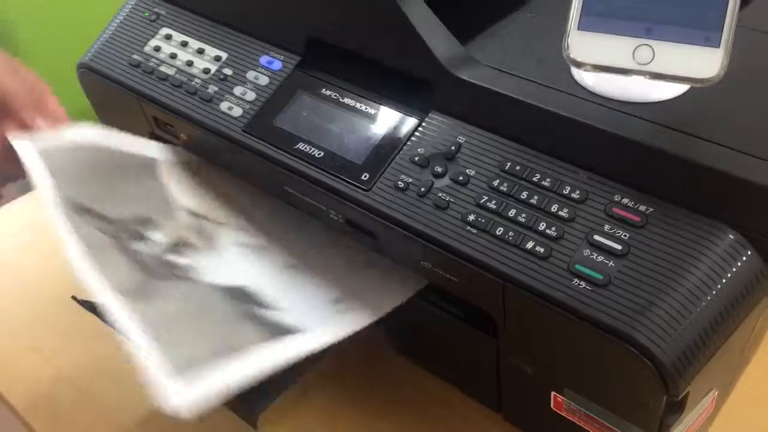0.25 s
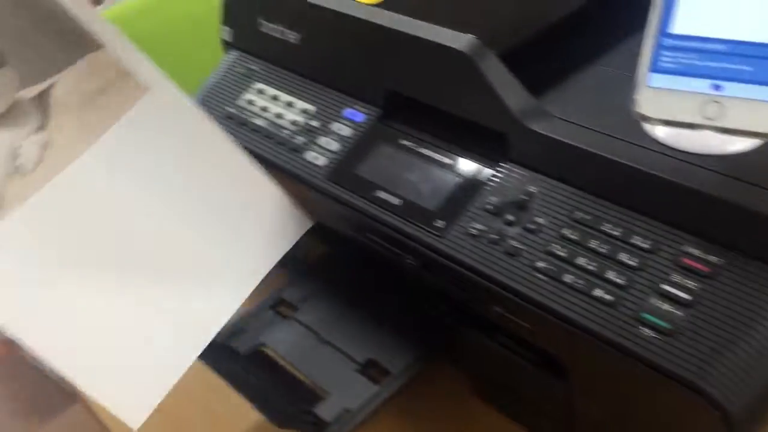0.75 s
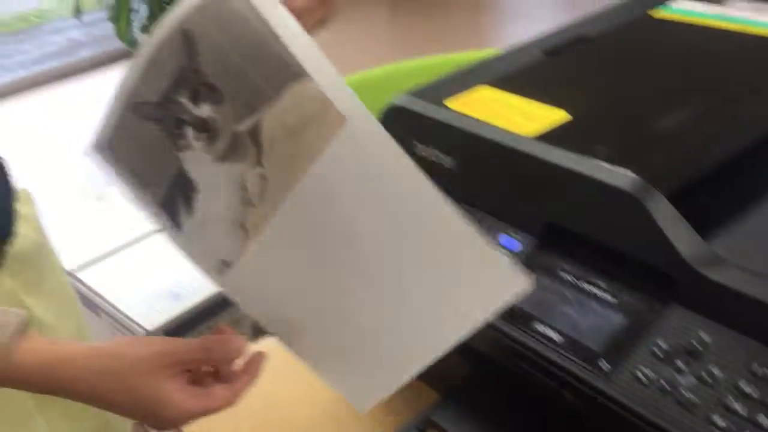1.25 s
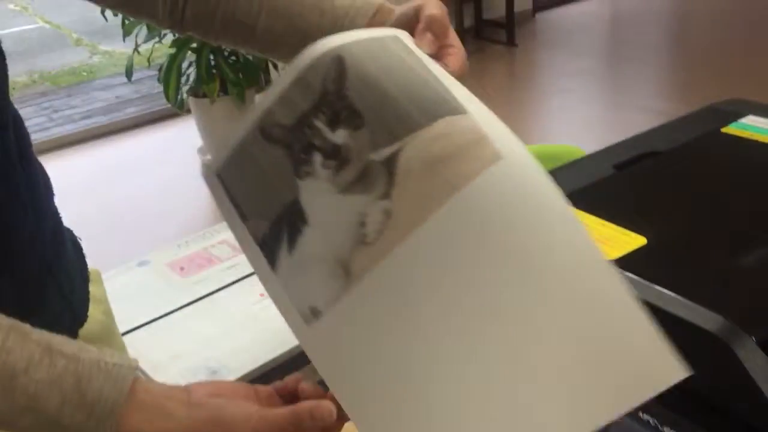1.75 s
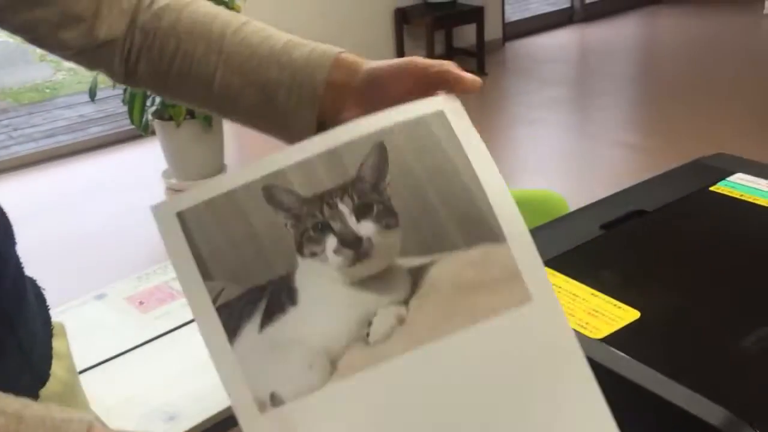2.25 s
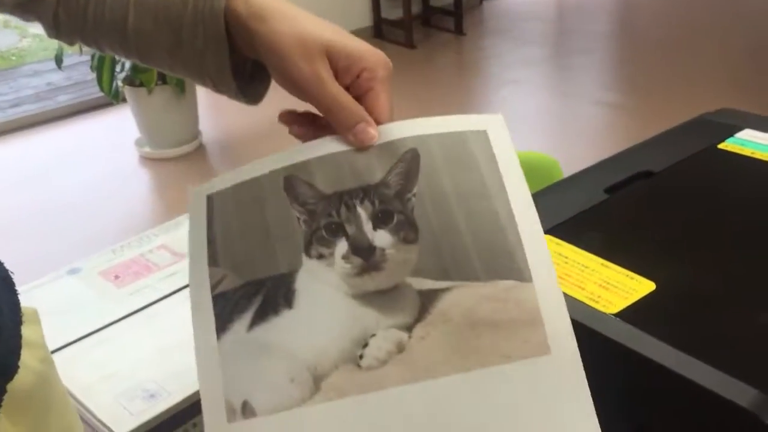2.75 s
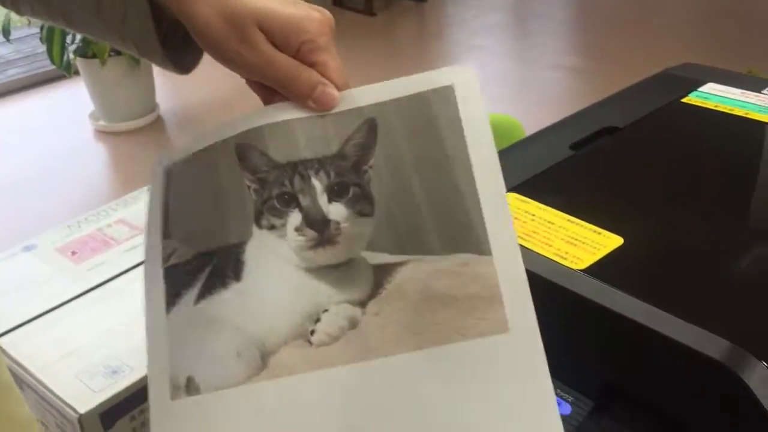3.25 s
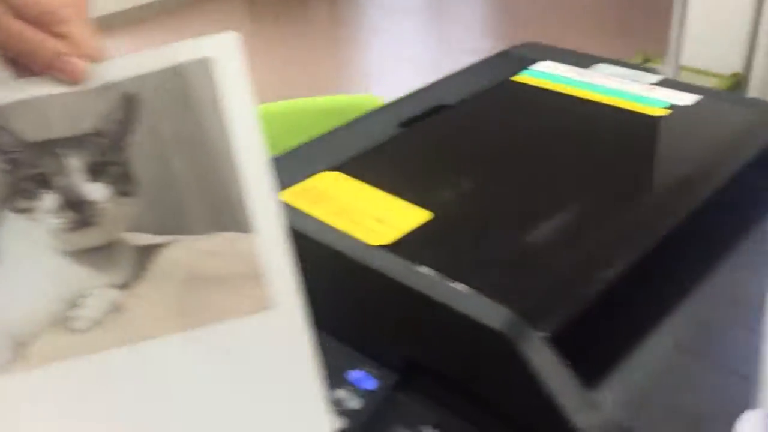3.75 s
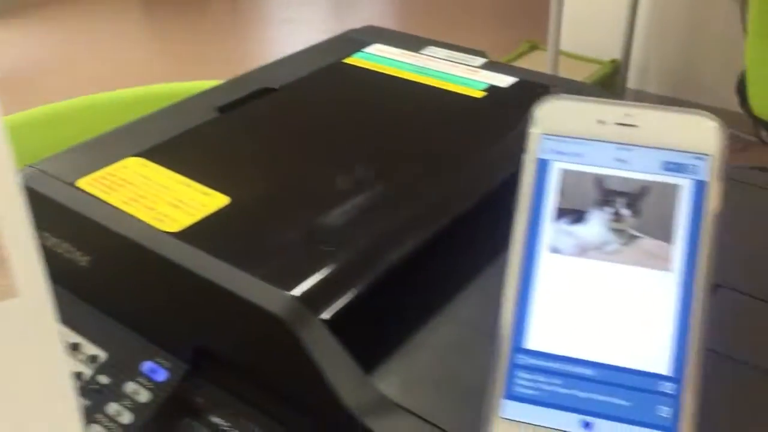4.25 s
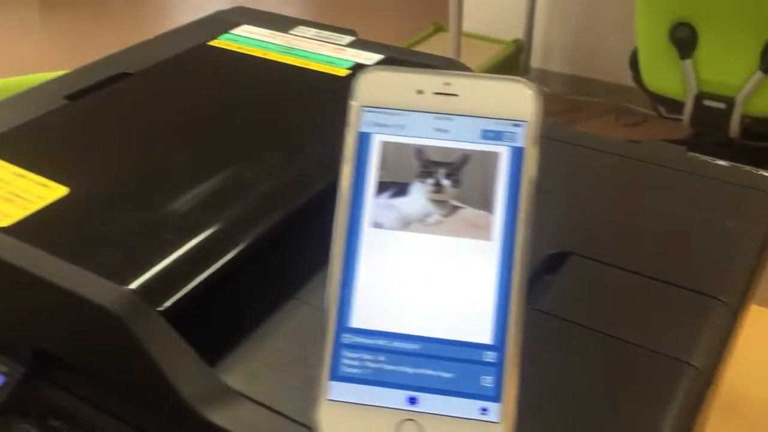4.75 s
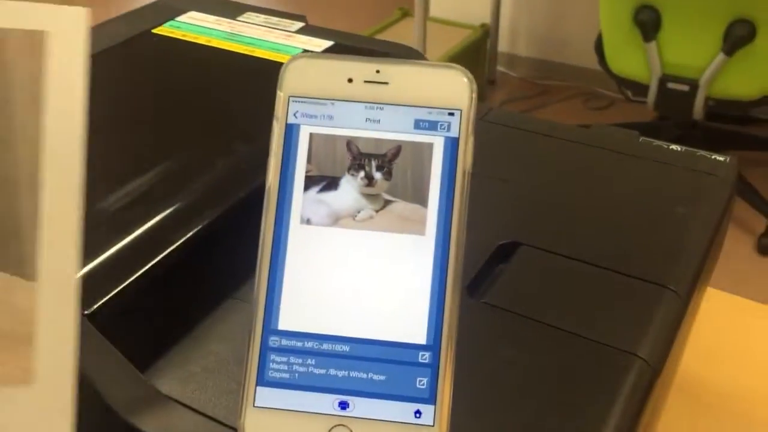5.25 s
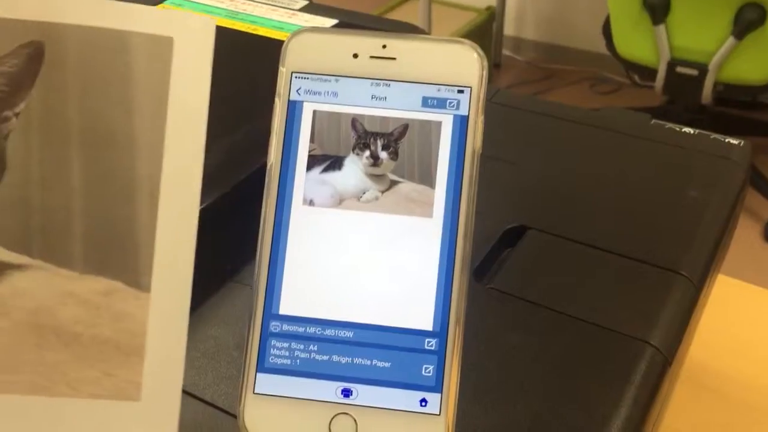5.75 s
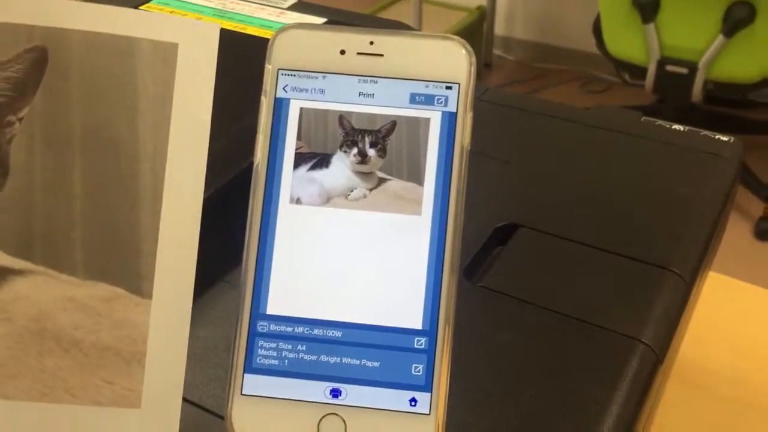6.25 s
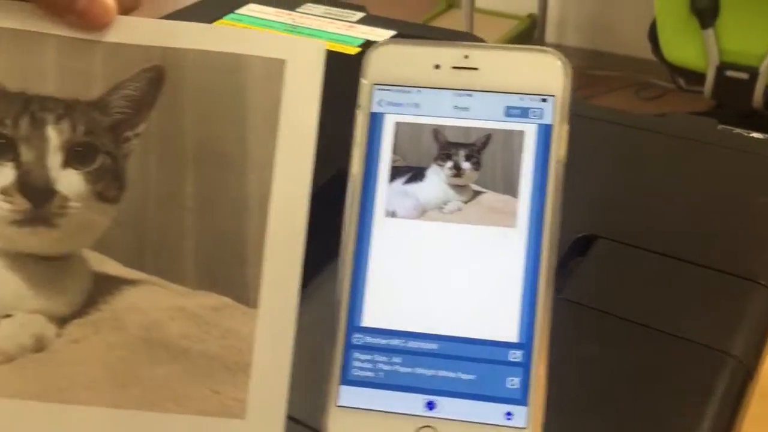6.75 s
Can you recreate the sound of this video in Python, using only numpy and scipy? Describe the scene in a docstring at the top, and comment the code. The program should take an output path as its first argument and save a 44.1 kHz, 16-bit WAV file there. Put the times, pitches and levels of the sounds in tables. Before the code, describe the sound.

Close in a quiet room, paper rustles, buckles and clacks, a printer carriage whirs once briefly, and a low motor ticks and throbs.

```python
"""A quiet room, close to an inkjet printer that finishes a page. The stiff sheet is pulled off the tray: filtered
noise grains slide and flap, and short bursts and damped modes snap, buckle and thump among plastic clacks.
A feed motor's hum runs down at the start. Later the carriage makes one short run, a whine that follows its
speed over rolling noise; then a slow motor ticks and hums, two close tones beating in a swelling throb.
Soft room reflections and filtered noise for the ventilation lie underneath."""
import sys
import numpy as np
from scipy import signal
from scipy.fft import rfft, irfft, next_fast_len
from scipy.io import wavfile
from scipy.ndimage import uniform_filter1d, map_coordinates

SR = 44100
rng = np.random.default_rng(int(sys.argv[2]) if len(sys.argv) > 2 else 0)


def generate_wav(signal):
    """Clip the signal to [-1, 1] and save it as 16-bit WAV at the path in sys.argv[1]."""
    frames = np.transpose(np.atleast_2d(signal))
    scaled = np.clip(frames, -1, 1) * 32767
    pcm = np.round(scaled).astype(np.int16)
    wavfile.write(sys.argv[1], SR, pcm)


N = 309582
T = np.arange(N) / SR  # the scene's time line in seconds

# The sheet dragged off the tray. Each row: time in seconds, friction in dB before the PULL_DB trim.
PULL_FRICTION = [(0.15, -64), (0.272, -51.5), (0.388, -53), (0.858, -56.5), (0.92, -53.5), (1.048, -53),
                 (1.162, -69), (1.392, -76.5), (1.45, -75)]
# Later brushes and flaps of the sheet. Each row: start in seconds, hold in seconds, fade to -60 dB in seconds,
# level in dB, brightness in dB (grain gains it, bending loses it).
PAPER_STROKES = [(0.088, 0.037, 0.15, -59.5, -4), (0.22, 0.021, 0.024, -53, 15),
                 (0.545, 0.024, 0.06, -56.5, -13.5), (0.698, 0.051, 0.05, -63, 12.5),
                 (0.945, 0.035, 0.035, -54.5, -2), (1.06, 0.051, 0.28, -66, 2.5),
                 (1.215, 0.029, 0.024, -59, 0.5), (1.5, 0.44, 0.26, -76.5, -2),
                 (1.683, 0.042, 0.03, -59, 0), (2.06, 0.13, 0.054, -55.5, -0.5),
                 (2.19, 0.14, 1.08, -57, -4.5), (2.747, 0.19, 0.29, -58, 4.5), (3.136, 0.038, 0.29, -65, 1),
                 (3.3, 0.031, 0.97, -72.5, -8), (3.532, 0.018, 0.42, -69, -2), (3.73, 0.11, 0.28, -78, 7),
                 (4.74, 0.17, 0.11, -74, 1), (6.58, 0.06, 0.54, -72, -3.5), (6.72, 0.28, 0.3, -83, -8)]
# Broad bending of the sheet. Each row: frequency in Hz, gain in dB.
BENDING_SPECTRUM = [(300, -19), (700, -16), (1100, -7), (1600, 0.5), (2200, 0.5), (3000, -17.5),
                    (4500, -21.5), (9000, -47)]
# Rubbing fibres. Each row: frequency in Hz, gain in dB.
FIBRE_SPECTRUM = [(1000, -53), (2500, -6.5), (3300, -4.5), (4200, 0), (4900, -2.5), (5700, -3), (6700, -8),
                  (7600, -23), (10000, -36), (15500, -37)]
# Finest grain of the sheet. Each row: frequency in Hz, gain in dB.
SHEEN_SPECTRUM = [(3000, -37), (6500, 0), (8000, -3), (9700, 1), (10600, -4), (11800, 0.5), (13500, -8),
                  (15500, -5.5)]
# Sharp snaps of paper and plastic. Each row: start in seconds, level in dB, centre in Hz,
# bright edge in dB over the body.
SNAPS = [(0.102, -42.5, 1930, -7), (0.118, -42, 1850, -1.5), (0.237, -30.5, 1980, 5),
         (0.262, -40.5, 1420, -13), (0.653, -41, 1030, -1), (0.709, -39, 1230, -19),
         (0.739, -35.5, 1590, -16), (0.825, -39.5, 1990, -14), (0.872, -32.5, 1380, 4),
         (0.989, -38.5, 1190, 0.5), (1.041, -44, 1070, 1), (1.272, -43, 1750, -19), (1.418, -47, 894, -23),
         (1.763, -46, 830, -16), (2.151, -32, 1560, -8), (2.171, -32, 1880, -18), (2.253, -24.5, 1280, -26),
         (2.365, -43, 1450, -21), (2.5, -35, 1174, -16), (2.784, -31.5, 1230, -6.5),
         (3.067, -27.5, 2010, -3), (3.096, -36.5, 1000, -23), (3.26, -39, 1880, -5.5),
         (3.288, -30.5, 1200, -5), (3.464, -50, 1430, -26), (3.556, -50, 1930, 0.5),
         (3.589, -58.5, 1720, 0), (5.291, -49.5, 988, -26), (5.944, -59, 1260, -5.5)]
# Damped modes of one snap. Each row: multiple of its centre, level in dB; both scatter from snap to snap.
SNAP_MODE_TABLE = [(.66, -17.5), (1.0, 9), (1.38, -3), (1.8, 0)]
# Bright edge of a snap. Each row: nominal frequency in Hz, level in dB; both scatter from snap to snap.
EDGE_MODE_TABLE = [(3900, 3.5), (4500, 1.5), (5500, 2.5), (6400, -4), (9700, -13), (12000, -16)]
# The sheet buckling and plastic parts chattering. Each row: start in seconds, hold in seconds, level in dB,
# treble boost in dB before levelling.
CHATTERS = [(0.115, 0.0066, -44, 10), (0.555, 0.0099, -45, 17), (0.615, 0.027, -51.5, -18),
            (0.72, 0.048, -50.5, 10), (0.948, 0.028, -52.5, 11), (1.327, 0.05, -57.5, -24),
            (1.695, 0.032, -52, -13), (1.739, 0.032, -54, -8), (2.08, 0.054, -41.5, -8),
            (2.145, 0.038, -40, -2.5), (2.195, 0.031, -51, 9), (2.264, 0.02, -46.5, -11),
            (2.306, 0.005, -41.5, -2), (2.506, 0.0045, -48, -6), (2.786, 0.013, -40.5, -9),
            (2.938, 0.01, -47, -32), (3.009, 0.03, -56, -31), (3.09, 0.021, -43, -19),
            (3.253, 0.049, -37.5, 4), (3.284, 0.0089, -33.5, -4), (3.336, 0.014, -50.5, -5),
            (6.063, 0.017, -63.5, 16), (6.738, 0.015, -61.5, 6)]
# Dull pushes of the sheet and the drive. Each row: start in seconds, hold in seconds, level in dB, centre in Hz.
PUSHES = [(0.655, 0.019, -43, 159), (0.709, 0.035, -38, 146), (0.792, 0.028, -45, 131),
          (2.152, 0.032, -53, 97), (2.936, 0.0082, -51, 356), (3.08, 0.052, -50, 152),
          (3.262, 0.041, -50.5, 413), (4.854, 0.02, -46.5, 174), (5.169, 0.035, -51, 400),
          (5.287, 0.021, -45.5, 166)]
# Ring of sheet and housing. Each row: frequency in Hz, gain in dB.
HOUSING_SPECTRUM = [(71, -27.5), (120, -3), (240, -1.5), (300, -22), (367, -6), (478, -15.5), (563, -3.5),
                    (955, 2), (1350, 1.5), (1830, 3), (2390, -3.5), (3110, -14.5), (4300, -14.5),
                    (7450, -43), (15500, -45.5)]
# Rolling along the rail. Each row: frequency in Hz, gain in dB.
RAIL_SPECTRUM = [(35, -46), (60, -18), (210, -10), (266, -14.5), (343, -8), (394, -17), (721, -11),
                 (792, -16), (976, 0.5), (1070, -11.5), (1960, -12), (2590, -26), (3670, -23.5),
                 (9740, -38.5), (15500, -45)]
# Resonances of the carriage's frame. Each row: frequency in Hz, width in Hz, level in dB.
FRAME_MODES = [(153, 19, 3), (210.6, 19, 5.5), (350, 8.2, -1), (712, 58, -6), (870, 170, -3)]
# The slow motor's 10th and 11th orders. Each row: level in dB at the start, swell in dB per second.
MOTOR_ORDERS = [(-59, 4.5), (-71.5, 11)]
# Decay of the room. Each row: frequency in Hz, time to -60 dB in seconds.
WALL_DECAY = [(150, 0.6), (1500, 0.43), (5000, 0.33), (14000, 0.23)]
# Murk of the ventilation. Each row: frequency in Hz, gain in dB.
AIR_SPECTRUM = [(15, -40), (25, -11), (79, -3), (113, -15.5), (148, -8.5), (169, -16.5), (253, -12.5),
                (368, -21), (433, -24.5), (523, -23.5), (703, -26.5), (970, -26.5), (1200, -28.5),
                (2920, -34), (15500, -45.5)]

# the pull: level trim, brightness at the outset, and its loss as the sheet comes free
PULL_DB, PULL_BRIGHT_DB, DULLING_DB_PER_S = -3, 3.5, -8
STROKE_RISE_S = 0.0088
FLUTTER_DB, HISS_DB, SHEEN_DB = -1, -2, -7.5  # shares of the bending, the rubbing and the finest grain
CRINKLE_PER_S, CRINKLE_DB = 130, -12.5  # single fibres letting go as the sheet bends
CRACK_DB = -10.5  # toneless share of a snap's bright edge
RING_DB, RING_T60_S = -8, 0.066  # ring of the housing after every snap
RUN_START_S, RUN_STOP_S, SPEED_UP_S, BRAKE_S = 4.843, 5.216, 0.05, 0.08  # one run of the carriage
WHINE_HZ = 985  # its motor at full speed, before the flutter
# base levels at full speed; amplitude goes as this power of the speed
ROLL_DB, WHINE_DB, SPEED_LAW = -50, -42, 1.2
PANEL_DB, PANEL_WIDTH_HZ = -7.5, 4.8  # a panel tuned to the whine
FEED_HZ, FEED_DB, FEED_OFF_S, FEED_T60_S = 88.2, -56.5, 0.91, 2.44  # mean hum, switch-off, run-down
MOTOR_ON_S, SHAFT_HZ = 5.3, 18.53  # the slow motor's start, and its turns per second
DRONE_HZ, DRONE_DB, DRONE_DB_PER_S = 149.4, -55, -2.5  # the case droning with it
# gear ticks, about one a turn, dying as the drive settles
TICKS_START_S, TICKS_DB, TICKS_T60_S, TICK_SCATTER_S = 5.445, -58.5, 1.57, 0.008
NUDGE_S, NUDGE_LENGTH_S, NUDGE_DB = 3.11, 0.17, -55.5  # a short turn of the drive
NUDGE_HZ, NUDGE_RISE_HZ = 135, 69.6
TOP_HZ = 15450  # band limit of the recorder


def amp(db):
    """Decibels to gain."""
    return 10 ** (np.asarray(db) / 20)


def unit(x):
    """Scale to rms 1."""
    return x / np.sqrt(np.mean(x ** 2) + 1e-20)


def along(points, hz):
    """Read (Hz, value) points on a log frequency axis."""
    f, v = np.transpose(points)
    return np.interp(np.log(hz + 1), np.log(f + 1), v)


def wobble(rate):
    """A smooth random curve, rate knots a second."""
    return map_coordinates(rng.standard_normal(int(N * rate / SR) + 4), [T * rate])


def filtered(x, response):
    """Shape x with a response given as a function of frequency."""
    m = next_fast_len(len(x) + 8192)  # padding leaves room for the ring
    return irfft(rfft(x, m) * response(np.fft.rfftfreq(m, 1 / SR)), m)[:len(x)]


def resonance(f, hz, width):
    """Causal response of one damped mode."""
    return 1j * f * width / (hz * hz - f * f + 1j * f * width)


def treble(f, hz):
    """A smooth step from 0 below hz to 1 above."""
    return f ** 4 / (f ** 4 + hz ** 4)


def grains(rate, spread_db, size=N):
    """Tiny impacts at random times and of random sizes, rate of them a second."""
    struck = rng.random(size) < rate / SR
    sizes = amp(spread_db * rng.standard_normal(size))
    return unit(rng.standard_normal(size) * struck * sizes)


def patchy(x, depth_db, order=7):
    """Shifting colour: random gain patches a few hundred hertz wide."""
    z = signal.stft(x, nperseg=512)[2]
    field = rng.standard_normal(z.shape)
    for axis in (0, 1, 0, 1):
        field = uniform_filter1d(field, size=order, axis=axis)
    coloured = z * amp(depth_db * unit(field))
    return unit(signal.istft(coloured, nperseg=512)[1][:len(x)])


def burst(t, length, rise, t60):
    """Rise, hold for a length, die away."""
    return (1 - np.exp(-t / rise)) * amp(-60 * np.maximum(t - length, 0) / t60)


def gate(start, length, rise, t60):
    """A burst placed at start seconds on the scene's time line."""
    return burst(np.maximum(T - start, 0), length, rise, t60)


def add(track, s, x):
    """Mix x into the track at s seconds."""
    part = track[max(round(s * SR), 0):][:len(x)]
    part += x[:len(part)]


def rub(spectrum, rate, depth_db):
    """Fibres catch and slip: dense grains coloured by the sheet, the colour shifting in patches."""
    coloured = filtered(grains(rate, 0.5), lambda f: amp(along(spectrum, f)))
    return patchy(coloured, depth_db)


def paper():
    """The sheet slides or is brushed; brighter contact trades broad bending for fine grain."""
    times, friction = np.transpose(PULL_FRICTION)
    start, end = times[0], times[-1]
    pull = amp(np.interp(T, times, friction) + PULL_DB) * gate(start, end - start, 0.013, 0.16)
    pull_bright = PULL_BRIGHT_DB + DULLING_DB_PER_S * np.minimum(T, end)

    # each contact is a force over time and its brightness in dB
    contacts = [(pull, pull_bright)]
    for s, length, fade, db, bright_db in PAPER_STROKES:
        contacts.append((amp(db) * gate(s, length, STROKE_RISE_S, fade), bright_db))
    bending_force = sum(force * amp(-bright) for force, bright in contacts)
    rubbing_force = sum(force for force, bright in contacts)
    grain_force = sum(force * amp(bright) for force, bright in contacts)

    flutter = amp(FLUTTER_DB) * bending_force * rub(BENDING_SPECTRUM, rate=2600, depth_db=3.5)
    crinkle = unit(filtered(grains(CRINKLE_PER_S, 3.6),
                            lambda f: amp(along(FIBRE_SPECTRUM, f)) + amp(along(BENDING_SPECTRUM, f))))
    fibres = amp(HISS_DB) * rub(FIBRE_SPECTRUM, rate=3700, depth_db=2.5)
    hiss = rubbing_force * (fibres + amp(CRINKLE_DB) * crinkle)
    sheen = amp(SHEEN_DB) * grain_force * rub(SHEEN_SPECTRUM, rate=6200, depth_db=1.5)
    grip = amp(1.2 * wobble(45))
    return grip * (flutter + hiss + sheen)


def struck(t, modes, scale, t60):
    """One blow rings a few heavily damped modes, each a little off in pitch and level."""
    tones = 0
    for multiple, db in modes:
        hz = multiple * scale * np.exp(rng.normal(0, 0.046))
        tones = tones + amp(db + rng.normal(0, 2.85)) * np.sin(2 * np.pi * (hz * t + rng.random()))
    fade = burst(t, 0, 0.0004, t60)
    return unit(tones * fade) * np.sqrt(np.mean(fade ** 2)) / fade.max()


def clicks():
    """Each snap strikes damped modes in its own register and a bright edge; the housing rings briefly."""
    out, t = np.zeros(N), np.arange(SR // 5) / SR
    for s, db, hz, edge_db in SNAPS:
        crack = filtered(rng.standard_normal(len(t)), lambda f: treble(f, 2500) * (1 - treble(f, 7000)))
        crack = unit(crack) * burst(t, 0.00056, 0.00074, 0.014)
        edge = amp(-1.5) * struck(t, EDGE_MODE_TABLE, 0.99, t60=0.0092) + amp(CRACK_DB) * crack
        snap = struck(t, SNAP_MODE_TABLE, hz, t60=0.0099) + amp(edge_db) * edge
        ring = unit(filtered(rng.standard_normal(len(t)), lambda f: amp(along(HOUSING_SPECTRUM, f))))
        ring = amp(RING_DB) * ring * burst(t, 0, 0.00092, RING_T60_S)
        add(out, s, amp(db) * (snap + ring))
    return out


def rattles():
    """A crowd of small impacts, each ringing briefly in the panel that it shakes."""
    out, t = np.zeros(N), np.arange(SR // 2) / SR
    for s, length, db, treble_db in CHATTERS:
        panel = rng.standard_normal(len(t)) * amp(-60 * t / 0.017)
        impacts = signal.fftconvolve(grains(4000, 2.2, size=len(t)), panel)[:len(t)]
        body = filtered(impacts, lambda f: amp(along(HOUSING_SPECTRUM, f) + treble_db * treble(f, 2900)))
        add(out, s, amp(db) * unit(body) * burst(t, length, 0.0007, 0.085))
    return out


def thumps():
    """Soft pushes shake the sheet or the whole case: short noise through a broad low resonance."""
    out, t = np.zeros(N), np.arange(SR // 3) / SR
    for s, length, db, hz in PUSHES:
        shape = burst(t, length, 0.0013, 0.15)
        noise = rng.standard_normal(len(t))
        shake = shape * filtered(noise, lambda f: resonance(f, hz, 0.68 * hz) ** 2)
        add(out, s, amp(db) * shake * np.linalg.norm(shape) / np.linalg.norm(shake))
    return out


def frame_response(f):
    """The carriage's frame resonates at a few low modes."""
    return sum(amp(db) * resonance(f, hz, width) ** 2 for hz, width, db in FRAME_MODES)


def carriage():
    """It speeds up, rolls on its rail with a whining motor, and brakes; speed sets whine pitch and levels."""
    ramp = np.clip(np.minimum((T - RUN_START_S) / SPEED_UP_S, (RUN_STOP_S - T) / BRAKE_S), 0, 1)
    speed = np.sin(np.pi / 2 * ramp)
    effort = speed ** SPEED_LAW
    flutter = 0.003 * wobble(70)
    turn = 2 * np.pi * np.cumsum(WHINE_HZ * speed * (1 + flutter)) / SR

    drive = grains(6000, 1) * (1 + 0.12 * np.cos(turn))
    roll = patchy(filtered(drive, lambda f: amp(along(RAIL_SPECTRUM, f))), depth_db=1)
    frame = unit(filtered(rng.standard_normal(N), frame_response))
    rolling = amp(ROLL_DB) * effort * (amp(6.0) * roll + amp(-0.5) * frame)

    whine_level = effort * amp(WHINE_DB + 2.2 * wobble(35))
    octave = amp(-9 + 2 * wobble(35)) * np.sin(2 * turn)
    whine = whine_level * (np.sin(turn) + octave)
    # the panel keeps ringing after the motor stops
    panel = filtered(whine, lambda f: resonance(f, WHINE_HZ, PANEL_WIDTH_HZ))
    return rolling + whine + amp(PANEL_DB) * panel


def tone(hz, drift):
    """A sine of rms 1 whose pitch drifts at random."""
    return np.sqrt(2) * np.sin(2 * np.pi * np.cumsum(hz * (1 + drift * wobble(9))) / SR)


def feed_motor():
    """An unsteady low hum that dies away after the motor is switched off."""
    level = gate(0, FEED_OFF_S, 0.015, FEED_T60_S) * amp(FEED_DB + 4.3 * wobble(9.8))
    return level * tone(FEED_HZ, 0.017)


def case_response(f):
    """The case answers the slow motor at three low resonances."""
    return resonance(f, 122, 105) ** 2 + 0.7 * resonance(f, 56, 6.3) + 0.053 * resonance(f, 300, 90)


def slow_motor():
    """Two neighbouring shaft orders swell and beat once a turn over the drone and rumble of the case."""
    age = np.maximum(T - MOTOR_ON_S, 0)
    drone = amp(DRONE_DB + DRONE_DB_PER_S * age + 4.4 * wobble(14)) * tone(DRONE_HZ, 0.0191)
    orders = 0
    for order, (db, swell) in enumerate(MOTOR_ORDERS, 10):
        orders = orders + amp(db + swell * age) * tone(order * SHAFT_HZ, 0.00053)
    rumble = amp(-62.5 + 5.7 * wobble(3.8)) * unit(filtered(rng.standard_normal(N), case_response))
    return gate(MOTOR_ON_S, T[-1], 0.0073, 1) * (drone + orders + rumble)


def ticking():
    """The gears tick about once a turn of the slow motor, dying away over one second with uneven levels."""
    out, t = np.zeros(N), np.arange(SR // 10) / SR
    for age in np.arange(0, 1, 1 / SHAFT_HZ):
        noise = rng.standard_normal(len(t))
        tooth = unit(filtered(noise, lambda f: amp(along(HOUSING_SPECTRUM, f) + 4.6 * treble(f, 2200))))
        level_db = TICKS_DB - 60 * age / TICKS_T60_S + rng.normal(0, 2.5)
        start = TICKS_START_S + age + rng.normal(0, TICK_SCATTER_S)
        add(out, start, amp(level_db) * tooth * burst(t, 0, 0.0006, 0.18))
    return out


def nudge():
    """The drive turns briefly: a low hum whose pitch rises and falls with its speed."""
    speed = np.sin(np.pi * np.clip((T - NUDGE_S) / NUDGE_LENGTH_S, 0, 1))
    turn = 2 * np.pi * np.cumsum(NUDGE_HZ + NUDGE_RISE_HZ * speed ** 2) / SR
    level = amp(NUDGE_DB) * gate(NUDGE_S, NUDGE_LENGTH_S, 0.01, 0.11)
    return level * np.sqrt(2) * np.sin(turn)


def walls(x):
    """The room's answer: a noise tail in which each frequency dies at its own speed."""
    hz, t, z = signal.stft(rng.standard_normal(SR // 2), SR, nperseg=256)
    decay = amp(-60 * t / along(WALL_DECAY, hz)[:, None])
    tail = signal.istft(z * decay, SR, nperseg=256)[1]
    return signal.fftconvolve(x, tail / np.linalg.norm(tail))[:N]


def ventilation():
    """The murk of the room's ventilation: steady noise, mostly low."""
    return amp(-64) * unit(filtered(rng.standard_normal(N), lambda f: amp(along(AIR_SPECTRUM, f))))


def scene():
    """Sheet and printer with a little room around them, over the hums and the ventilation."""
    near = paper() + clicks() + rattles() + thumps() + carriage() + ticking()
    hums = feed_motor() + slow_motor() + nudge()
    return (near + amp(-12) * walls(near) + hums + ventilation())[None]


def record(dry):
    """The microphone loses the deepest bass, and the recorder keeps nothing above its band limit."""
    return np.array([filtered(x, lambda f: treble(f, 36) * (f < TOP_HZ)) for x in dry])


dry = scene()
out = record(dry)
generate_wav(out)
```